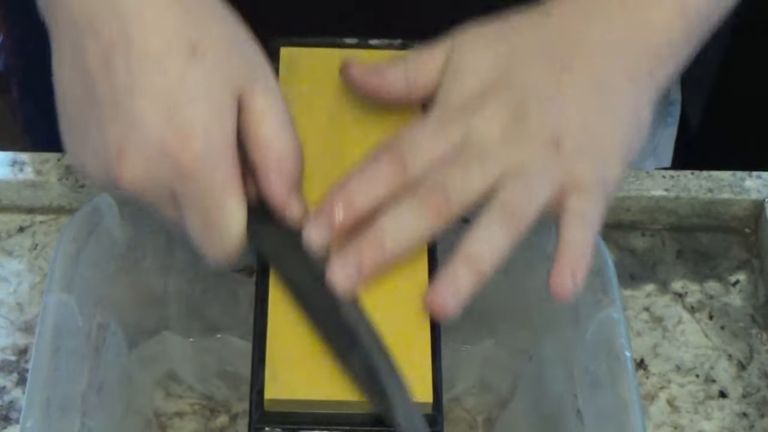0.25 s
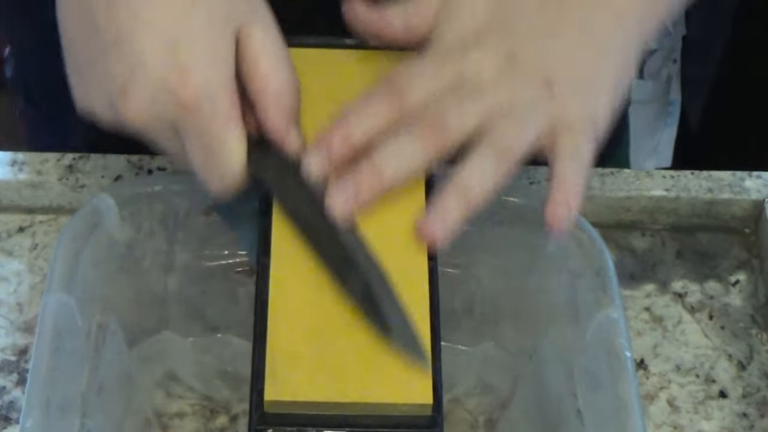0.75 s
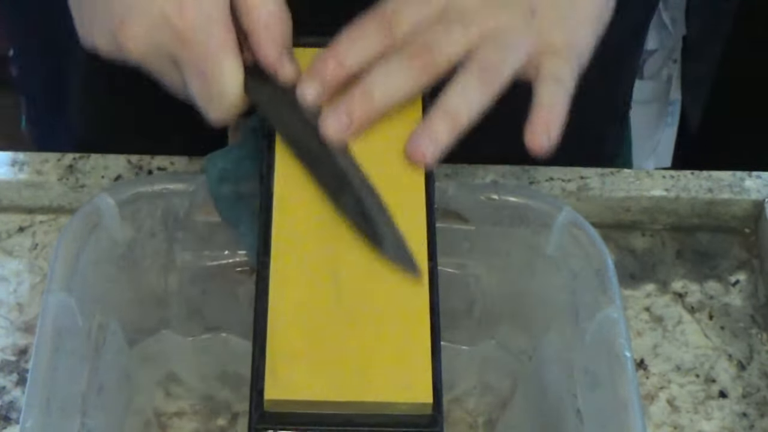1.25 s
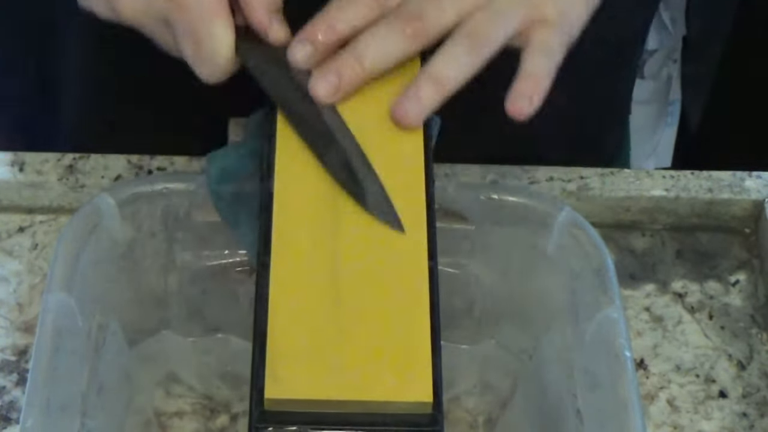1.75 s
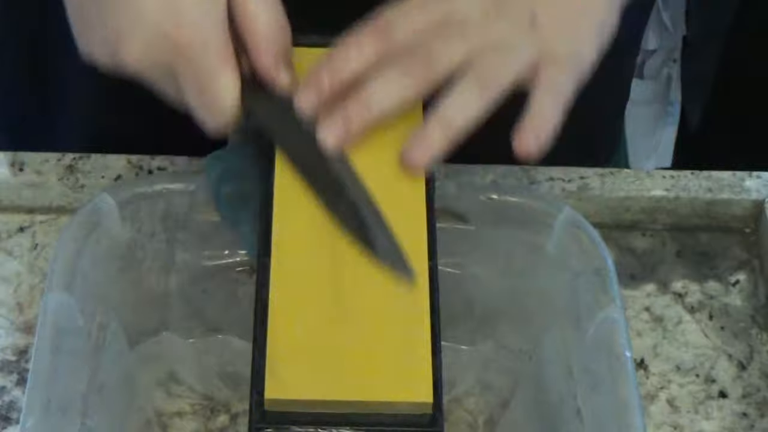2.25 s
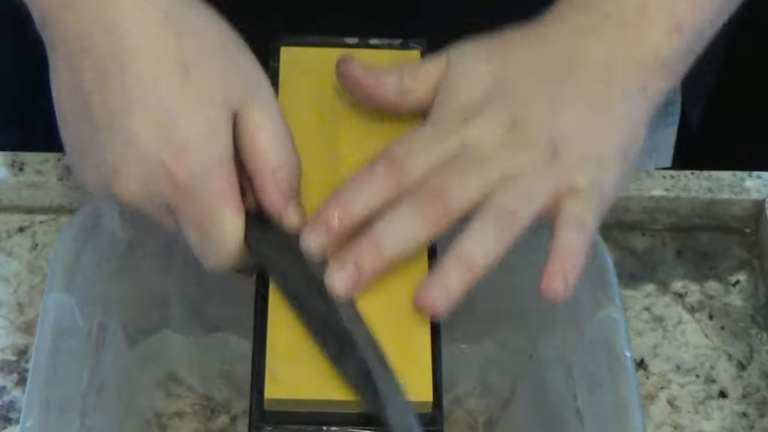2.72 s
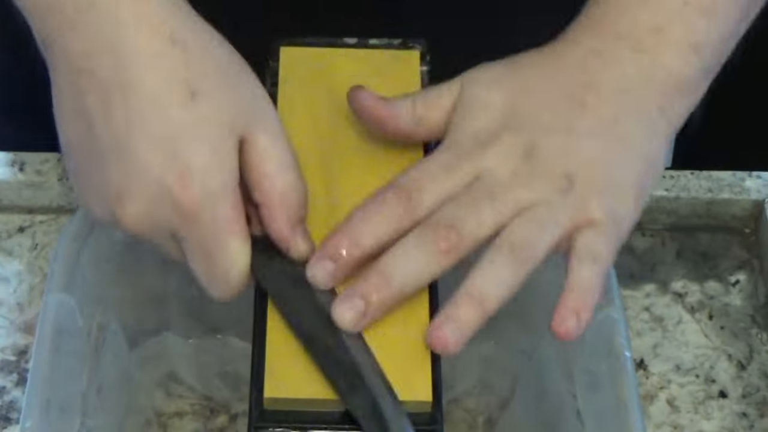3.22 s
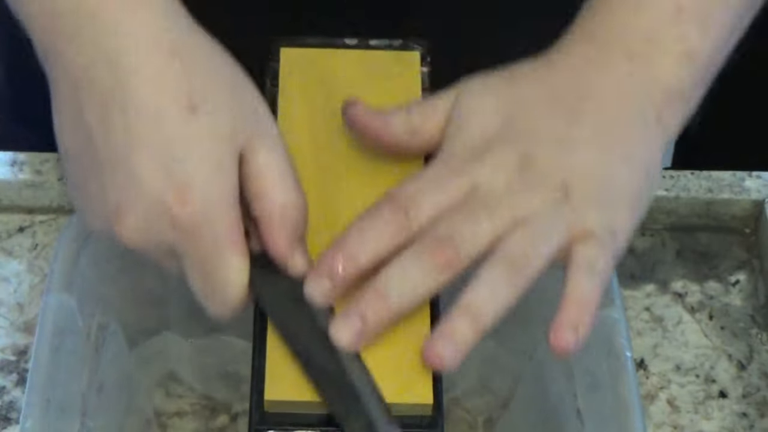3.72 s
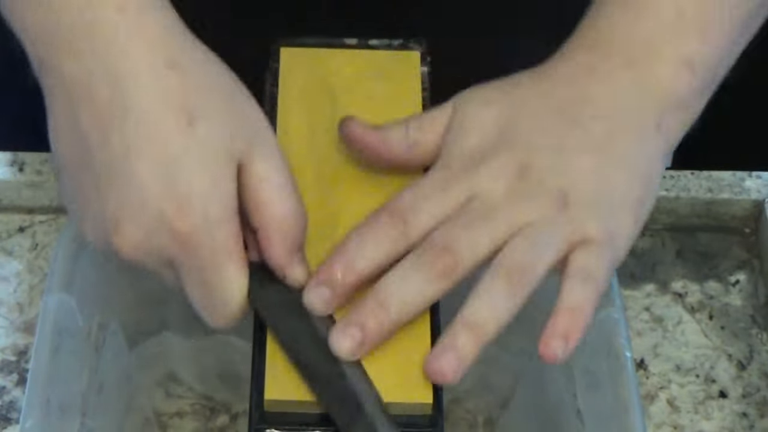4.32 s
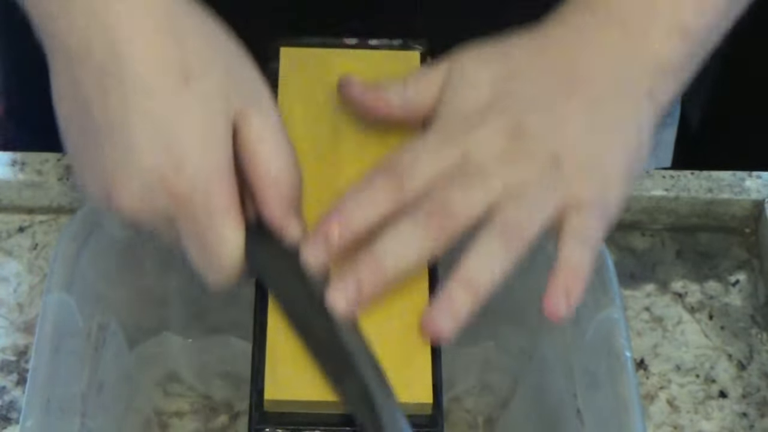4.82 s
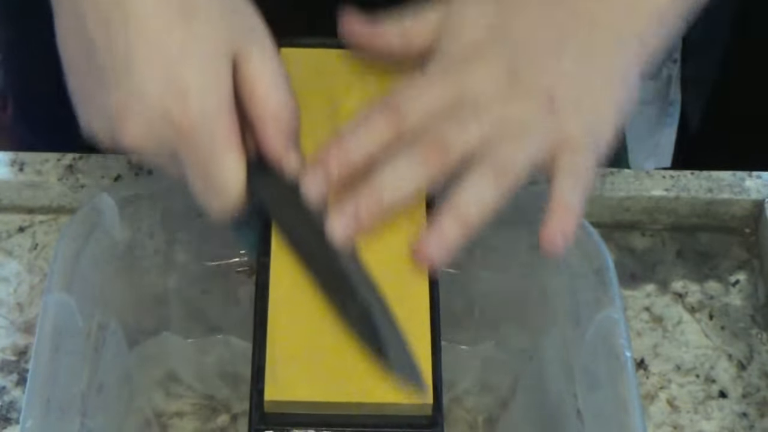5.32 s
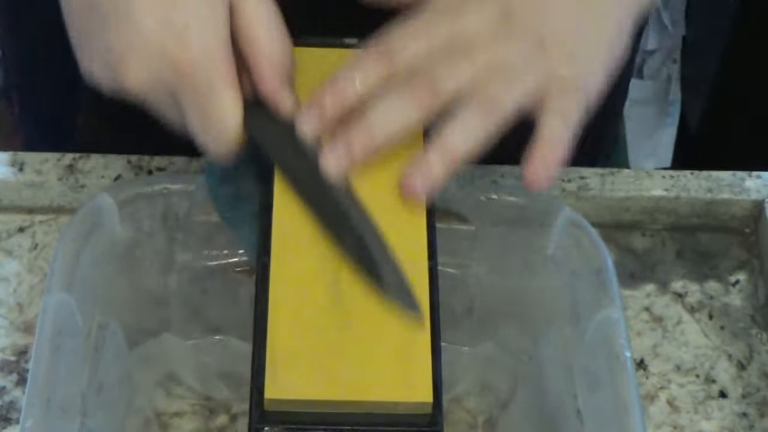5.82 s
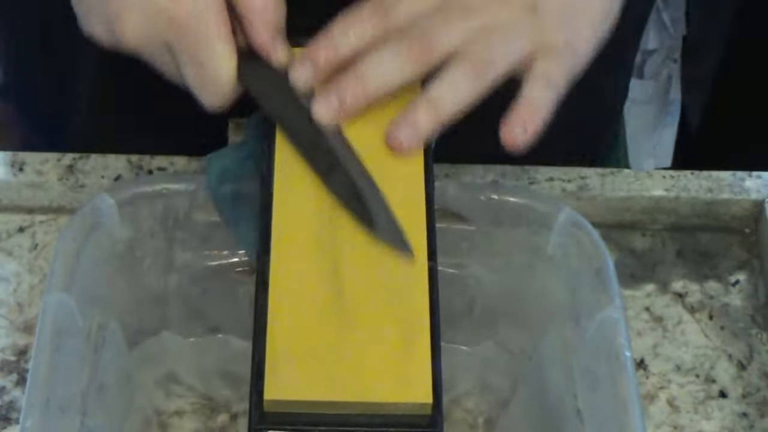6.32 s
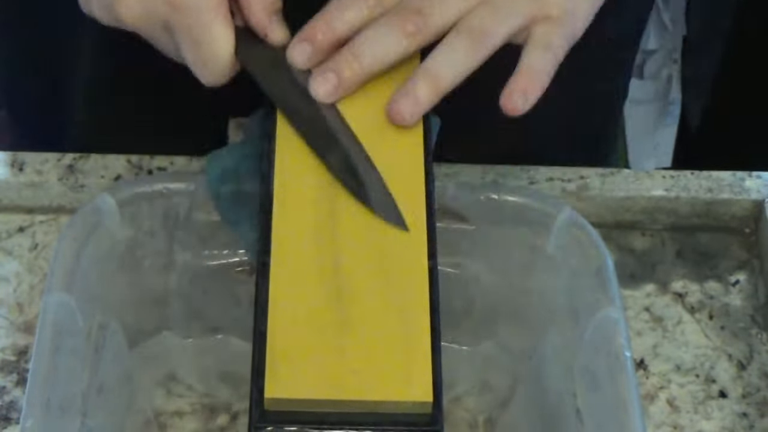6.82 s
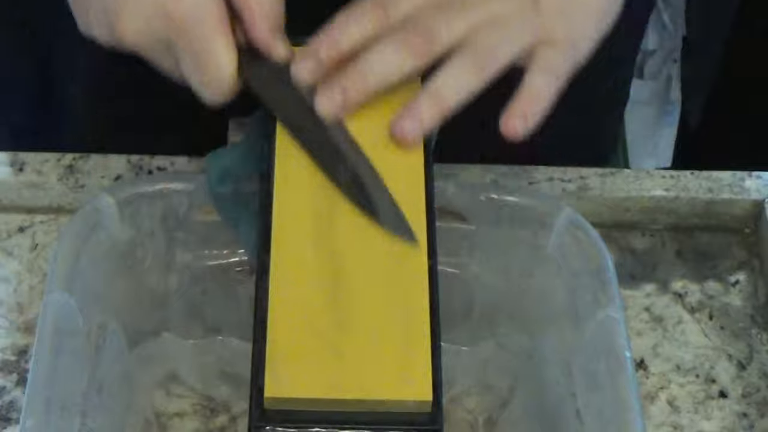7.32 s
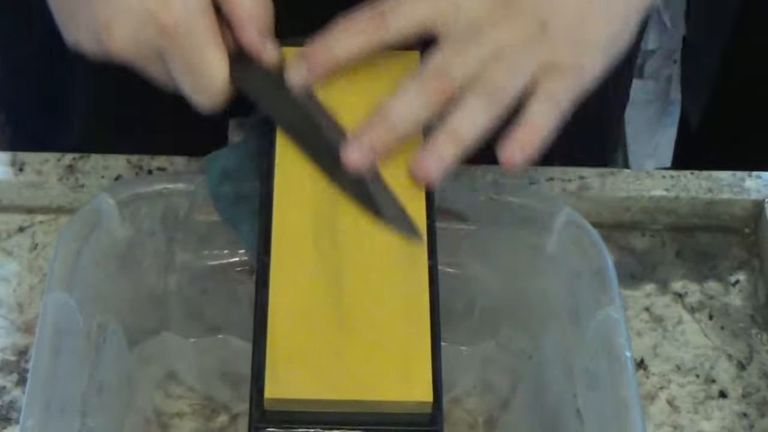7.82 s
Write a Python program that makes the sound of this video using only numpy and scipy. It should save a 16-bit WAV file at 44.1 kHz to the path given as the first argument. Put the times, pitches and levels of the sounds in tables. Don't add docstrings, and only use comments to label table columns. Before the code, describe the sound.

From 0 to about 8 seconds, a steel knife is pushed and pulled across a wet gritty stone, close to the microphone and almost central. Strokes last roughly 0.28 seconds each, alternating direction without a pause; the rasp drops for an instant at every turn and springs back sharply. The sound is bright and sandy, mostly high hiss and fizz with a thinner midrange growl and shifting metallic ringing. Strokes vary in force, stronger around 2.3 to 3.7 seconds and near 6.2, gentler around 1.7 and 5. Small grain cracks appear occasionally from 1.1 seconds, more often after 4. The tub beneath drums faintly. A low refrigerator hum near 100 hertz, a soft steady fan tone, a barely audible rattle and quiet room wash continue throughout; the hum shifts slightly after 6 seconds. Short kitchen reflections surround the scraping, which is still going at the end.

```python
import sys
import numpy as np
from scipy import signal
from scipy.io import wavfile
from scipy.ndimage import uniform_filter1d, map_coordinates

SR = 44100
rng = np.random.default_rng(int(sys.argv[2]) if len(sys.argv) > 2 else 0)


def output_pcm(signal):
    pcm = np.clip(np.atleast_2d(signal).T, -1, 1) * 32767
    wavfile.write(sys.argv[1], SR, np.round(pcm).astype(np.int16))


def boost_factor(decibels):
    exponent = np.asarray(decibels, float) / 20
    return 10 ** exponent


N = 355446


def evened(x):
    return x / np.sqrt(np.mean(x ** 2) + 1e-20)


def read(points, hz):
    f, value = np.transpose(points)
    return np.interp(np.log(hz + 1), np.log(f + 1), value)


def resonate(x, hz, width):
    turn = np.exp(2j * np.pi * np.cumsum(hz * np.ones(len(x))) / SR)
    r = np.exp(-np.pi * width / SR)
    return 2 * (turn * signal.lfilter([1 - r], [1, -r], x / turn)).real


def below(x, edge_hz):
    return signal.oaconvolve(x, signal.firwin(255, edge_hz, fs=SR), "same")


def drift(seconds):
    span = max(int(seconds * SR), 2)
    return evened(uniform_filter1d(uniform_filter1d(rng.standard_normal(N), span), span))


# frequency in Hz, density in dB per Hz.
WASH_COLOUR = [(25, -12), (41, -18), (60, -4), (78, -5), (120, 0.4), (160, -6), (250, -8), (400, -12),
               (800, -15), (1100, -19), (2500, -24), (6000, -30), (16000, -38)]
# frequency in Hz, likeness from 0 to 1.
EAR_LIKENESS = [(30, 0.95), (90, 1), (150, 1), (300, 0.79), (600, 0.79), (1200, 0.079), (3000, 0.19)]


def wash():
    frames, hz = N // 512 + 5, np.fft.rfftfreq(2048, 1 / SR)
    a, b, c, d = rng.standard_normal((frames, 1025, 4)).T
    same = np.clip(read(EAR_LIKENESS, hz), 0, 1)[:, None]
    mid = np.sqrt(1 + same) * (a + 1j * b)
    side = np.sqrt(1 - same) * (c + 1j * d)
    z = np.array([mid + side, mid - side]) * boost_factor(read(WASH_COLOUR, hz))[:, None]
    noise = signal.istft(z, nperseg=2048, noverlap=1536)[1][:, :N]
    return boost_factor(-48.5) * evened(noise)


# frequency in Hz, left level in dB, right level in dB.
FAN_TONE = (235.5, -53.5, -52.5)


def fan():
    t = np.arange(N) / SR
    phase = 2 * np.pi * FAN_TONE[0] * t + 0.13 * drift(0.042)
    tone = np.sqrt(2) * boost_factor(1.1 * drift(0.44)) * np.sin(phase)
    return boost_factor(np.array(FAN_TONE[1:]))[:, None] * tone


def rattle():
    ticks = np.diff(np.floor(np.arange(N + 1) * 30.05 / SR))
    ringing = resonate(resonate(ticks, 2580.0, 180.0), 2580.0, 180.0)
    return boost_factor(-64) * evened(ringing)


# time in seconds, pitch in Hz, level in dB.
COMPRESSOR_PATH = [(0.0, 97.7, -45), (0.54, 97, -46), (1.57, 97.6, -46.5), (2.8, 96.4, -42),
                   (3.34, 97.3, -45.5), (5.07, 96.6, -46), (5.32, 97.5, -43), (5.72, 98.8, -49.5),
                   (5.95, 98.05, -43.5), (6.67, 99.9, -53), (6.73, 99.5, -55), (6.96, 100.8, -48.5),
                   (7.63, 101.4, -51.5), (7.92, 99, -70), (8.06, 99.6, -53)]
# multiple of the pitch, level in dB, dB gained once the load changes.
COMPRESSOR_OVERTONES = [
    (2, -61, 2),
    (3, -67.5, 7.5),
]
# frequency in Hz, level in dB, width in Hz.
HUM_LINES = [(25.6, -67, 2.7), (60.8, -70, 2.2), (123.9, -53.5, 3.8), (150.6, -73.5, 8.9),
             (262.6, -63.5, 1.8), (353.2, -63.5, 2.3)]


def refrigerator():
    t = np.arange(N) / SR
    s, hz, level_db = np.transpose(COMPRESSOR_PATH)
    turns = np.cumsum(np.interp(t, s, hz) * (1 + 0.00451 * drift(0.034))) / SR
    load = np.clip((t - 6.05) / 0.15, 0, 1)
    tone = boost_factor(np.interp(t, s, level_db) + 2.5 + 0.5 * drift(0.2)) * np.sin(2 * np.pi * turns)
    for k, db, rise_db in COMPRESSOR_OVERTONES:
        swell = boost_factor(db + rise_db * load + 0.4 * k * drift(0.15))
        tone = tone + swell * np.sin(2 * np.pi * k * turns)
    air = rng.standard_normal(N)
    lines = sum(boost_factor(db) * evened(resonate(air, f, w)) for f, db, w in HUM_LINES)
    return np.sqrt(2) * tone + lines


def kitchen(x):
    taps = np.zeros((2, 12000))
    at = np.arange(60, 11980, 20) + rng.integers(0, 20, (2, 596))
    np.put_along_axis(taps, at, rng.choice([-1., 1.], at.shape), 1)
    hz, t, z = signal.stft(taps, SR, nperseg=128)
    t60 = read([(1000, 0.38), (4000, 0.22), (9000, 0.092), (16000, 0.061)], hz)[:, None]
    air = boost_factor(read([(1000, 6.0), (5000, -4.0), (9000, -6.5), (16000, -10.5)], hz))[:, None]
    tail = signal.istft(z * air * boost_factor(-60 * t / t60), SR, nperseg=128)[1]
    return signal.fftconvolve(x[None], tail / np.linalg.norm(tail[0]), axes=1)[:, :N]


# time in seconds, level of the halt in dB, slowing down in seconds.
BLADE_TURNS = [(0.124, -24, 0.019), (0.403, -34, 0.024), (0.675, -20.5, 0.025), (0.963, -30.5, 0.023),
               (1.248, -22, 0.016), (1.535, -32, 0.027), (1.822, -14, 0.0088), (2.116, -39, 0.0095),
               (2.396, -25, 0.0097), (2.699, -29, 0.011), (2.972, -15.5, 0.0039), (3.254, -27, 0.019),
               (3.528, -20, 0.0078), (3.824, -26, 0.012), (4.11, -25, 0.0072), (4.395, -29, 0.012),
               (4.682, -19, 0.0056), (4.967, -14, 0.019), (5.236, -16, 0.01), (5.515, -27, 0.016),
               (5.784, -17, 0.011), (6.052, -33.5, 0.022), (6.324, -17, 0.0085), (6.601, -27, 0.015),
               (6.88, -14, 0.017), (7.144, -38, 0.0059), (7.425, -29, 0.0085), (7.688, -10, 0.017),
               (7.951, -18, 0.0069)]


def place(t):
    s = np.transpose(BLADE_TURNS)[0]
    ends = np.r_[2 * s[0] - s[1], s, 2 * s[-1] - s[-2]]
    count = np.interp(t, ends, np.arange(len(s) + 2))
    return abs(count % 2 - 1)


# time of the peak in seconds, peak level in dB,
# start of the stroke in dB relative to the peak, its end in dB relative to the peak.
HAND_STROKES = [(0.023, -28.5, -1.5, -12), (0.222, -29, -7.5, -2), (0.549, -30, -11, -4),
                (0.755, -27.5, -16.5, -9), (1.017, -33.5, -6.5, -2.5), (1.4, -28.5, -6.5, -3),
                (1.661, -35.0, -4.5, -3.5), (1.968, -28, -26.5, -17.5), (2.292, -25.5, -17, -7),
                (2.495, -21.5, -13.5, -24), (2.811, -26, -17.5, -7.5), (3.084, -26.0, -11.5, -11),
                (3.398, -24, -14, -5.5), (3.638, -21.5, -14, -17.5), (4.01, -25, -18, -14.5),
                (4.227, -27.5, -10.0, -8.5), (4.504, -30.5, -11, -1.5), (4.943, -36, 1, -11),
                (5.207, -28, -10.5, -12.5), (5.3, -32.5, -1, -4.5), (5.711, -29, -10, -12.5),
                (5.804, -33, -2, 3.5), (6.23, -22.5, -14, -19), (6.535, -30, -6, -4),
                (6.795, -26, -15, -15), (7.036, -27.5, -4.5, -16.5), (7.336, -27.5, -7.0, -13),
                (7.617, -24.5, -10.5, -23.5), (7.89, -31, -2.5, -7), (7.987, -28.5, -11.5, -0.5)]
# time in seconds, change in dB, length in seconds.
EDGE_CATCHES = [(0.45, 7, 0.053), (1.125, 7.0, 0.012), (1.309, -4.5, 0.033), (1.423, -6, 0.043),
                (1.851, 11, 0.058), (2.064, 5.5, 0.024), (2.561, 4.5, 0.048), (3.496, -7, 0.033),
                (3.613, -5.5, 0.043), (3.881, 5, 0.046), (4.524, -4.5, 0.056), (4.582, 7.5, 0.028),
                (4.817, 2, 0.016), (4.88, 9, 0.079), (5.063, 4, 0.055), (5.163, -7.5, 0.03),
                (5.267, -5, 0.028), (5.585, 4.5, 0.065), (5.828, -9, 0.018), (5.968, -6.5, 0.04),
                (6.16, -9.5, 0.09), (6.411, 6, 0.039), (6.475, -5, 0.05), (6.661, 5, 0.058),
                (6.816, -6.0, 0.026), (6.911, -6.5, 0.035), (7.162, -6.0, 0.033), (7.574, -10.5, 0.053),
                (7.795, -2.5, 0.014), (7.899, 6, 0.056)]


def effort(t):
    turn_s, halt_db, slowing_s = np.transpose(BLADE_TURNS)
    peak_s, peak_db, start_db, end_db = np.transpose(HAND_STROKES)
    edges = np.r_[0, turn_s, N / SR]
    s = np.c_[edges[:-1] + 1 / SR, peak_s, edges[1:]].ravel()
    pressure = np.interp(t, s, np.c_[peak_db + start_db, peak_db, peak_db + end_db].ravel())
    since = t[:, None] - turn_s
    slowing = (np.maximum(-since - 0.0017, 0) / slowing_s) ** 1.01
    push_off = abs(since / 0.0046) ** 0.91
    halts = (halt_db * np.exp(-np.where(since < 0, slowing, push_off))).sum(1)
    catches = sum(db * np.exp(-((t - at) / (length / 2)) ** 2) for at, db, length in EDGE_CATCHES)
    return pressure + halts + catches


def grit(grains_per_s, spread_db, grain_db, catch_db, chatter_db):
    size = boost_factor(spread_db * np.minimum(rng.exponential(1, N), 3.)) * rng.choice([-1., 1.], N)
    grains = size * (rng.random(N) < grains_per_s / SR)
    uneven = boost_factor(catch_db * drift(0.024) + chatter_db * drift(0.0017))
    hiss = rng.standard_normal(N)
    return evened((hiss + boost_factor(grain_db) * evened(grains)) * uneven)


# frequency in Hz, density in dB per Hz.
SCRAPE_COLOUR = [(400, -40), (1000, -32), (2300, -24.5), (2500, -21), (3300, -18.5), (3600, -7.5),
                 (4550, -5), (4750, -2.5), (7000, -7), (8800, -5.5), (9400, 2), (11000, 2), (13500, -1),
                 (16000, -13)]
# frequency in Hz, width in Hz, level in dB.
BODY_MODES = [(750, 110, -18), (1380, 70, -21), (1830, 170, -17.5), (2920, 200, -14), (3330, 90, -15),
              (5050, 600, -8), (5900, 150, -10), (7520, 270, -10), (9620, 500, -4)]


def coloured(x):
    hz = abs(np.fft.fftfreq(4096, 1 / SR))
    modes = sum(boost_factor(db) ** 2 / (1 + (2 * (hz - f) / w) ** 2) ** 2 for f, w, db in BODY_MODES)
    log_gain = np.log(boost_factor(read(SCRAPE_COLOUR, hz)) ** 2 + modes) / 2
    taps = np.fft.ifft(np.exp(log_gain - 1j * signal.hilbert(log_gain).imag)).real
    return signal.oaconvolve(x, taps[:2048])[:N]


# frequency in Hz, glide in Hz per
WOKEN_MODES = [(4190, -600, 0.034, .15, 2.2), (5034, 300, 0.15, .18, 1.18), (3930, -300, 0.3, .09, 1),
               (4890, 0, .52, 0.08, 1.53), (5670, -3000, 0.293, 0, 3.25), (5910, -300, 0.62, 0.31, 0.87),
               (6630, 300, 0.83, 0.31, 0.91), (3780, -200, 0.69, 0.39, 1.34), (7370, 1000, 0.31, 0.19, 1.1),
               (9200, 0, 0.12, .15, 1.15), (9880, 400, 0.91, .25, .7), (10650, -1500, .72, 0.1, 1.1),
               (4680, 0, 0.21, 0, -1.44), (8400, 0, 1, 0.6, -0.062)]


def sliding_contact(x, wander, mode_db, speed_db, patchy_db, coarse_db):
    hz, t, z = signal.stft(x, SR, nperseg=512, noverlap=384)
    f_axis = hz[:, None]
    fine, coarse = rng.standard_normal((len(t), len(hz), 2)).T
    fine = evened(uniform_filter1d(uniform_filter1d(fine, size=2, axis=0), size=16, axis=1))
    coarse = evened(uniform_filter1d(uniform_filter1d(coarse, size=9, axis=0), size=12, axis=1))
    at = place(t)
    bend = 1 + wander * np.interp(t, np.arange(N) / SR, drift(0.048))
    leading = 0
    for f, glide, best, span, strength in WOKEN_MODES:
        with np.errstate(divide="ignore"):
            away = ((at - best) / span) ** 2 if span else np.where(at == best, np.nan, np.inf)
        pitch = bend * (f + glide * (at - best))
        leading = leading + strength * np.exp(-away - ((f_axis - pitch) / (0.033 * f)) ** 2)
    reach = np.cos(np.pi / 2 * at) ** 4
    leading = leading + (1.1 + 0.13 * t) * reach * np.exp(-((f_axis - 2720.) / 73.0) ** 2)
    ringing = 1 / (1 + (f_axis / 9000.0) ** 2)
    bins, frames = np.indices(fine.shape)
    fine = map_coordinates(fine, [bins / (1 + .07 * reach), frames], order=1)
    airy = (np.sin(np.pi * at) ** 0.47 - .75) * np.clip((f_axis - 10500.) / 5100.0, 0, 1)
    gain_db = mode_db * leading + speed_db * airy
    gain_db = gain_db + patchy_db * ringing * np.maximum(fine - .3, 0)
    gain_db = gain_db + coarse_db * np.clip(f_axis / 4860.0, 0, 1) * coarse
    woken = z * boost_factor(gain_db)
    supplied, taken = (uniform_filter1d((abs(v) ** 2).sum(0), size=9) for v in (z, woken))
    z = woken * np.sqrt(supplied / taken)
    return signal.istft(z, SR, nperseg=512, noverlap=384)[1][:N]


# time in seconds, peak level in dB.
GRAIN_CRACKS = [(1.12, -14), (1.185, -13), (1.457, -10), (1.844, -15), (1.979, -12.5), (2.0647, -23),
                (3.643, -8), (4.149, -10), (4.221, -5), (4.231, -5), (4.493, -11), (4.507, -7),
                (4.5885, -4), (5.0624, -5), (5.11, -11), (5.1781, -12), (5.198, -22), (5.581, -10.5),
                (6.1382, -8.5), (6.248, -8), (6.507, -5), (6.6636, -16), (7.315, -3), (7.4854, -9),
                (7.884, -3), (8.019, -7)]


def cracks():
    blows = np.zeros(N)
    for at, db in GRAIN_CRACKS:
        burst = rng.standard_normal(400) * np.exp(-np.arange(400) / 120.0)
        blows[round(at * SR):][:400] += boost_factor(db - 12.0) * burst
    return coloured(blows)


# time in seconds, growl gained in dB.
BEVEL_GROWL = [(0, 1), (.8, 0.5), (1.4, 0), (1.7, 2), (2.3, 4), (2.7, 1.5), (3.2, -0.5), (4, 0.5),
               (4.6, 2.5), (5.2, 2), (5.7, 1), (6.5, 0.5), (7, 2.5), (7.6, 1), (8.06, 4)]


def knife():
    t = np.arange(N) / SR
    s = np.arange(0, N, 16) / SR
    rasp_db, near = effort(s), place(s)
    midway = np.sin(np.pi * near)
    pressed_db = rasp_db + 34.5
    fizz_db = -5 + 2 * midway + 0.3 * near + 0.18 * np.minimum(pressed_db + 4.0, 0)
    growl_db = np.interp(s, *np.transpose(BEVEL_GROWL)) - 18 - 2.37 * midway + 0.85 * near
    growl_db = growl_db - 0.18 * np.maximum(pressed_db, -12)

    drive = grit(grains_per_s=1500.0, spread_db=4.5, grain_db=-6., catch_db=1.0, chatter_db=1.0)
    scrape = coloured(drive)
    blade = sliding_contact(scrape, wander=0.017, mode_db=7.0, speed_db=8.5, patchy_db=7.0, coarse_db=2.5)
    tub = below(scrape, 2230.0)
    low, growl, dull = below(blade, 2240.0), below(blade, 3517.0), below(blade, 8900.0)
    share = np.clip(boost_factor(np.interp(t, s, fizz_db)), .05, .95)
    rasp = np.sqrt(1 - share ** 2) * evened(dull - growl) + share * evened(blade - dull)
    rasp = rasp + boost_factor(np.interp(t, s, growl_db)) * evened(growl - low)
    tub_db = -28.5 + 6.2 * place(t) - 0.49 * t + 2.1 * drift(0.077)
    rasp = rasp + boost_factor(tub_db) * evened(tub)
    return rasp * boost_factor(np.interp(t, s, rasp_db) + 0.14) + cracks()


def scene():
    rasp = knife()
    close = rasp * boost_factor(np.array([[.15], [-.15]]))
    background = wash() + refrigerator() + fan() + rattle()
    return close + boost_factor(-10.5) * kitchen(rasp) + background


def narrowed(x, from_hz, under_db):
    mid, side = (x[0] + x[1]) / 2, (x[0] - x[1]) / 2
    hz, t, z = signal.stft(np.array([mid, side]), SR, nperseg=2048, noverlap=1024, window="cosine")
    bands = (abs(z[1, :1024]) ** 2).reshape(128, 8, -1).mean(1)
    loudness = (abs(z[0, hz > from_hz]) ** 2).mean(0)
    kept = np.repeat(bands > loudness * boost_factor(2 * under_db), repeats=8, axis=0)
    z[1, :1024] *= kept | (hz[:1024, None] < from_hz)
    mid, side = signal.istft(z, SR, nperseg=2048, noverlap=1024, window="cosine")[1][:, :N]
    return np.array([mid + side, mid - side])


def low_pass(x):
    return signal.sosfilt(signal.butter(12, 16230, fs=SR, output="sos"), x)


def record(dry):
    rounded = .36 * np.tanh(dry / .36)
    edge = signal.firwin(1023, 15820, window=("kaiser", 9), fs=SR)[None]
    limited = signal.oaconvolve(rounded, edge, "same")
    return low_pass(narrowed(limited, from_hz=1600., under_db=-15.0))


dry = scene()
out = record(dry)
output_pcm(out)
```